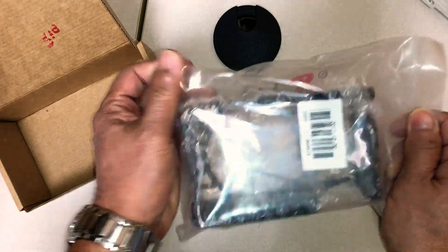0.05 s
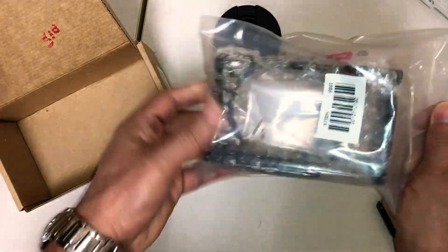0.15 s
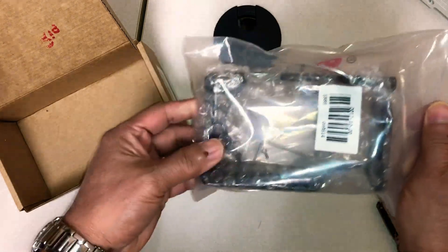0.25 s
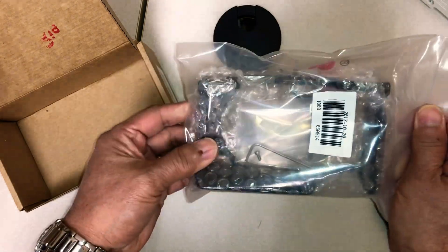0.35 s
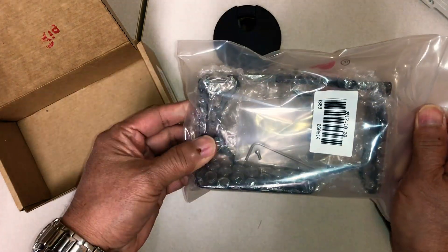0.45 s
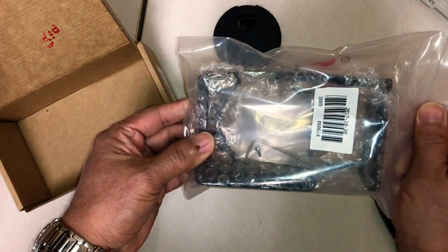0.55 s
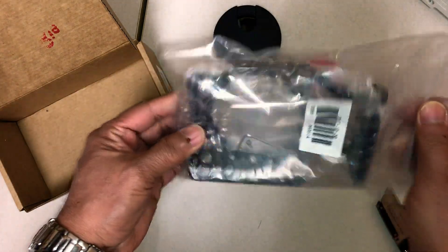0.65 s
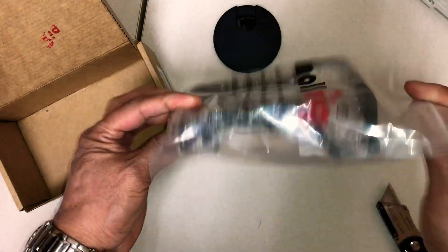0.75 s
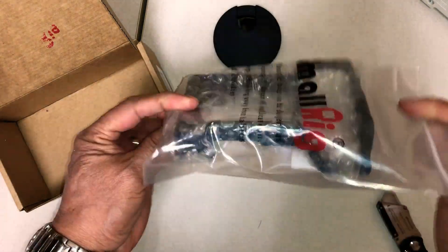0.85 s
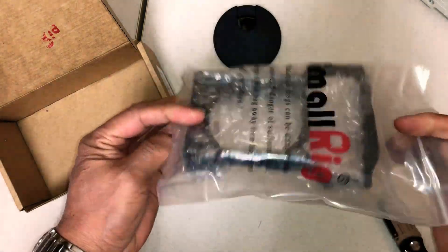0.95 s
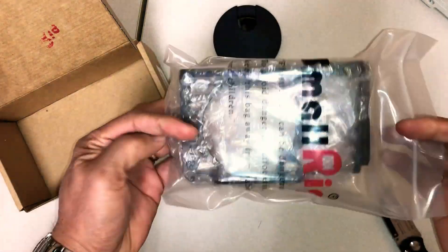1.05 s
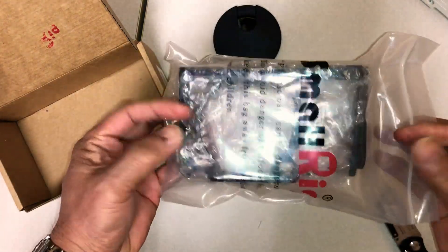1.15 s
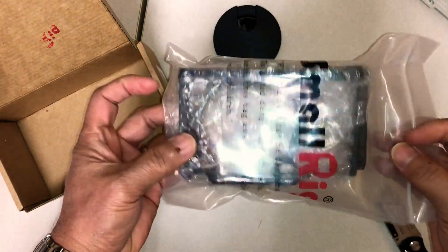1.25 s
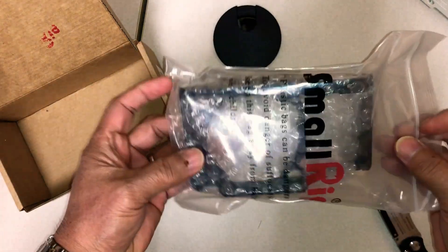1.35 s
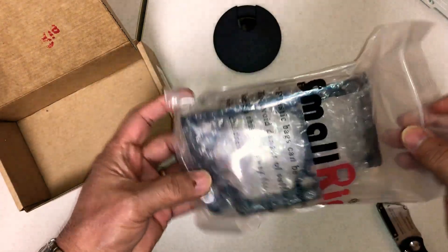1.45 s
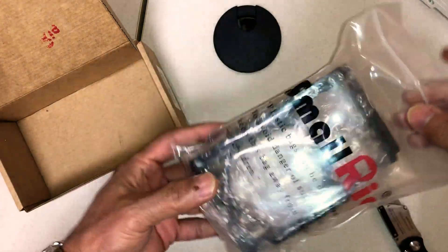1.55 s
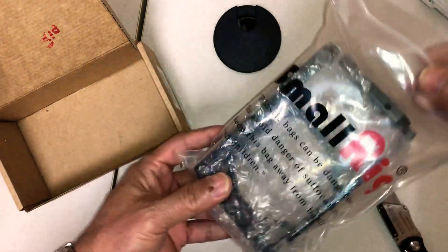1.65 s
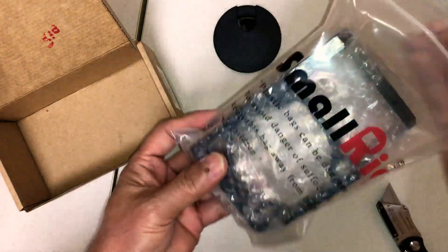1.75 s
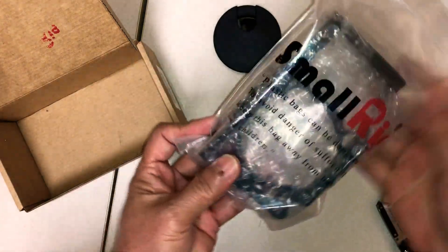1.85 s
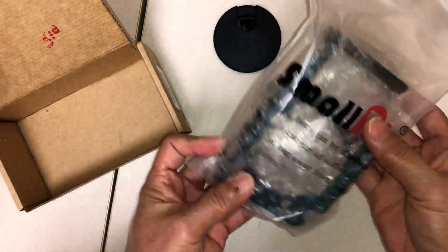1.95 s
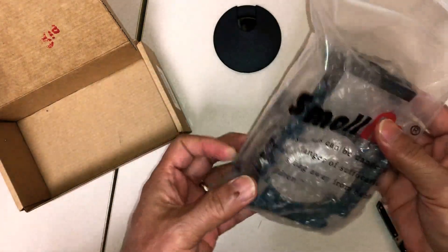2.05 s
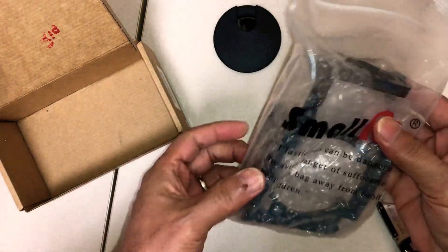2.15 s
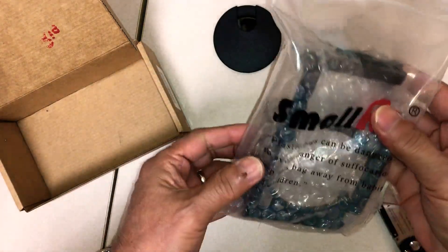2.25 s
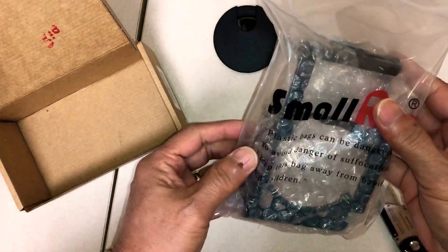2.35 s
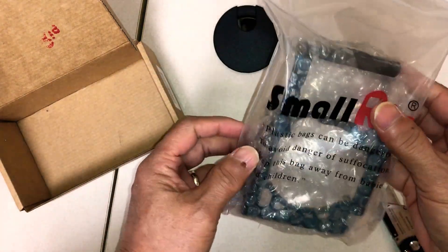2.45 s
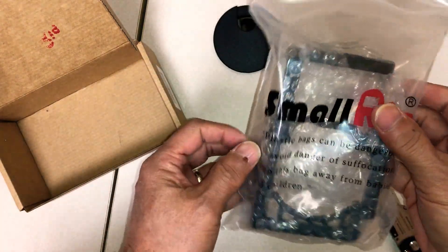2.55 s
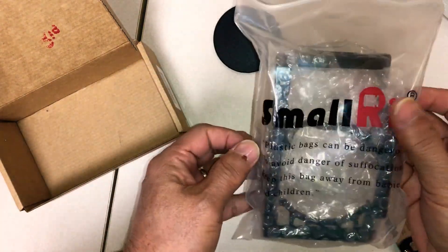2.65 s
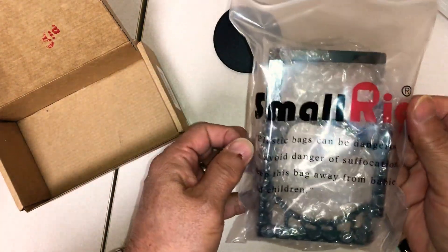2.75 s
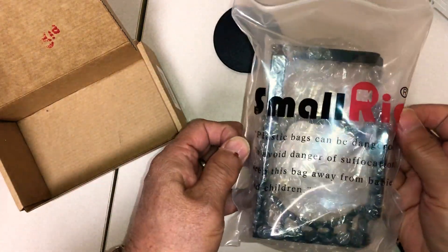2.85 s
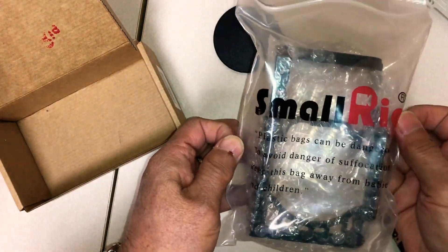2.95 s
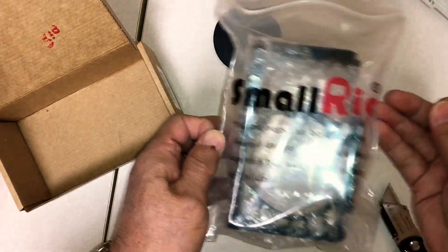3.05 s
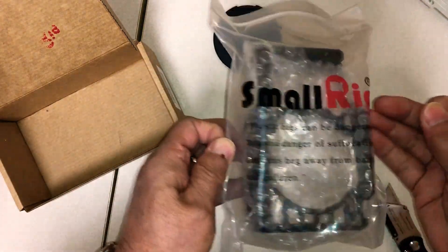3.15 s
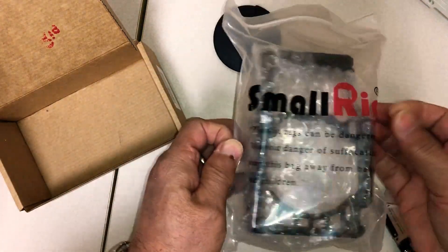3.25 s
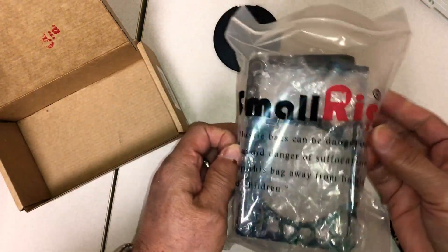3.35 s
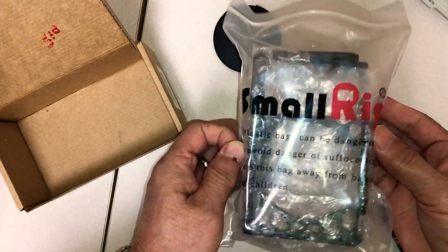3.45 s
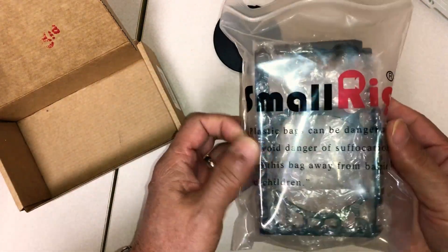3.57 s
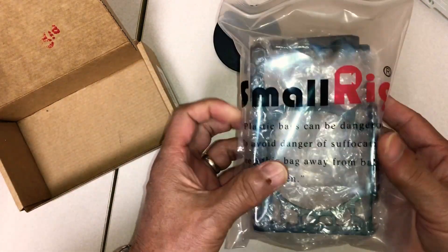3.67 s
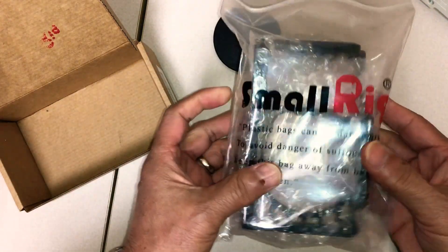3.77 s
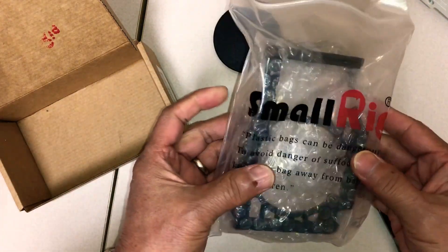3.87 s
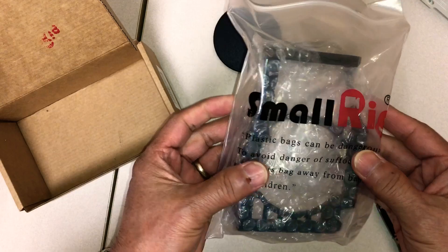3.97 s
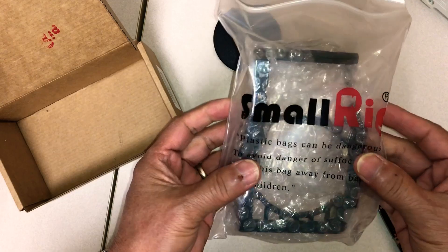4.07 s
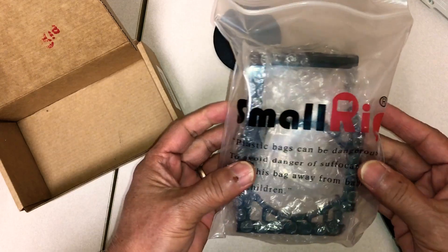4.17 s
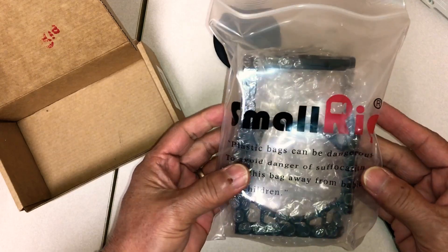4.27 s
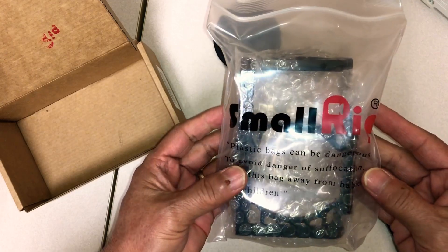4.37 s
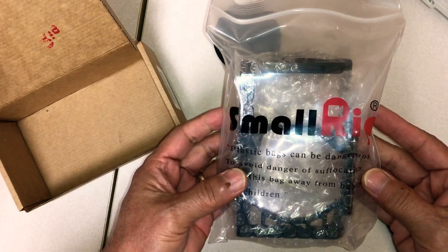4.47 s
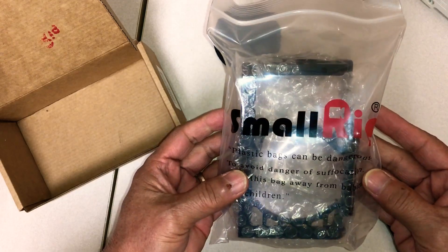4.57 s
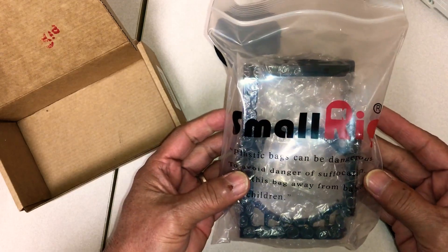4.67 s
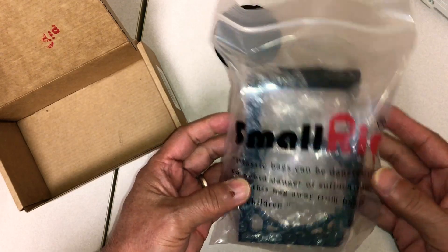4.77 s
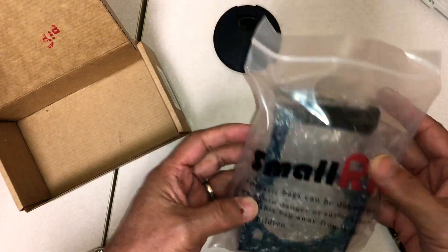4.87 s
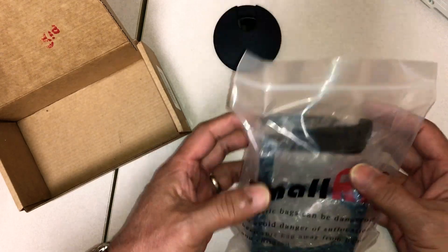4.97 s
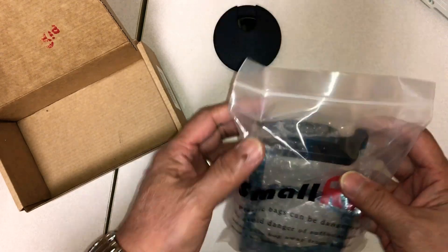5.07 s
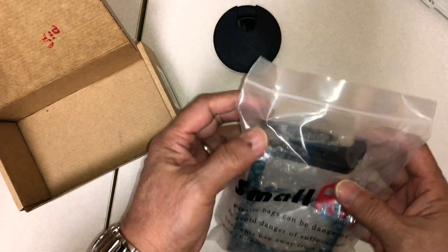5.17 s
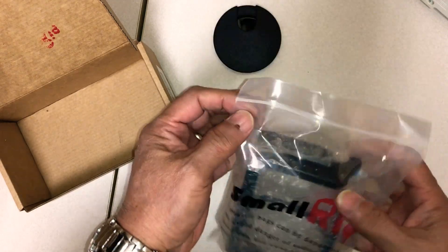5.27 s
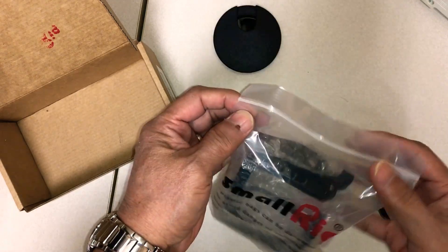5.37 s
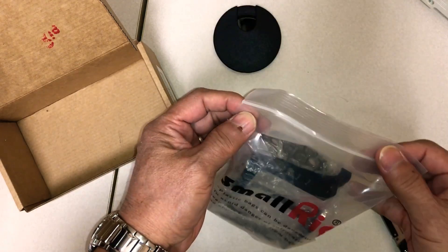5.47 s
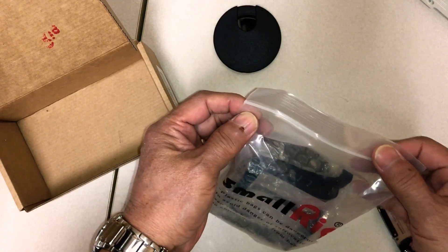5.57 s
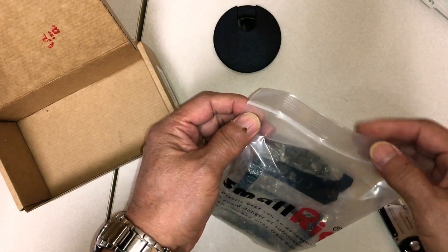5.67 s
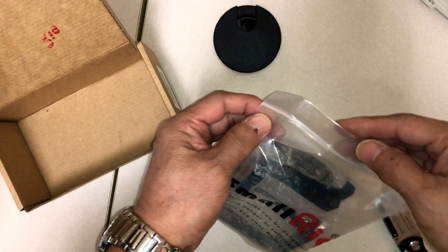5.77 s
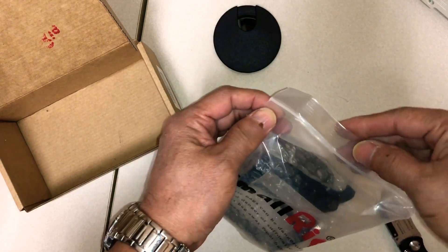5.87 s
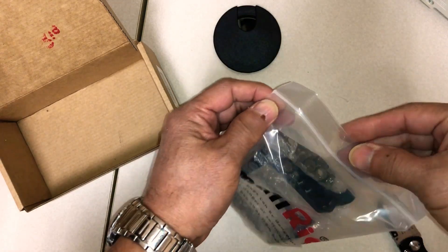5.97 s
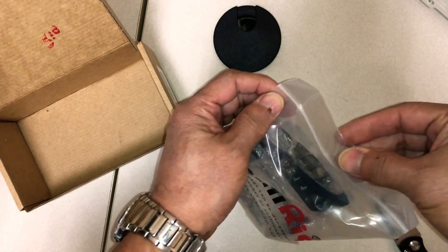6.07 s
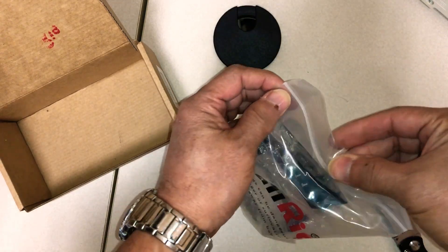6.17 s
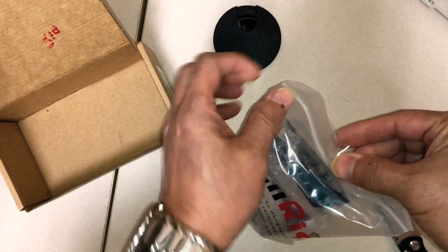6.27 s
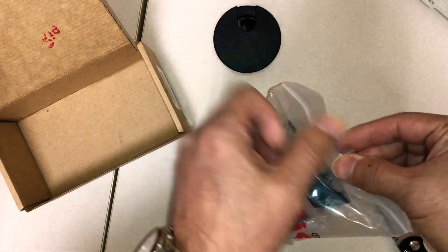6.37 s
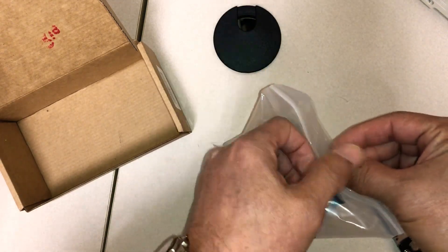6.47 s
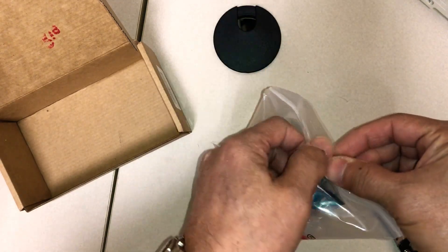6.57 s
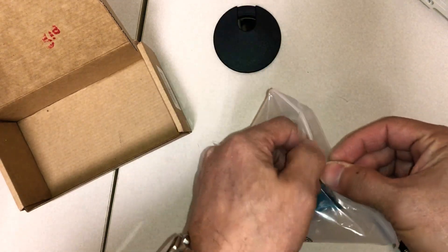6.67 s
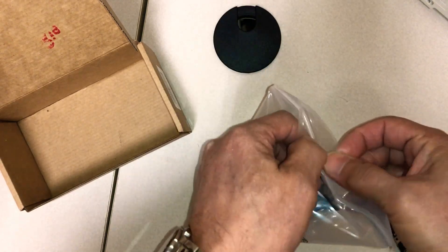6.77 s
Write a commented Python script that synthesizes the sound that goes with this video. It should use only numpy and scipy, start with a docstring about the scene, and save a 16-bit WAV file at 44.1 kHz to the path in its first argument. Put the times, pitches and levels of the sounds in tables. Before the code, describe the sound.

Close plastic packaging crackles and pops hollowly as hands turn it, quiets, then rustles briefly while fingers rub its seal over a faint hum.

```python
"""Short hollow snaps of a buckling plastic bag, close by in a small room: cracks, falling rings, air pushes.
Hands turn the bag, which holds a metal frame in bubble wrap; between snaps the film slides and crinkles,
made of random creases and smooth friction noise. Near the end fingers rub its seal: noise through resonances.
The frame clinks faintly once as decaying modes. Under it all lie coloured air noise and a low electric hum
of wavering sines; a decaying noise tail gives the echo."""
import sys
import numpy as np
from scipy import signal
from scipy.fft import rfft, irfft
from scipy.io import wavfile
from scipy.ndimage import uniform_filter1d

SR = 44100
rng = np.random.default_rng(int(sys.argv[2]) if len(sys.argv) > 2 else 0)


def materialize(psi):
    """Save the field psi as 16-bit PCM at rate SR to the path in sys.argv[1].

    A 1-D psi becomes a single channel; in a 2-D psi each row is a channel.
    """
    bounded = np.clip(np.atleast_2d(psi).T, -1, 1)
    quanta = np.round(bounded * 32767).astype(np.int16)
    wavfile.write(sys.argv[1], SR, quanta)


N = 300762  # length [samples]


def amp(db):
    """Level law: decibels to amplitude gain, 20 dB per factor of ten."""
    return 10 ** (np.asarray(db) / 20)


def evened(x):
    """Normalisation of mean power: scales to rms 1."""
    return x / np.sqrt(np.mean(x ** 2) + 1e-20)


def read(points, hz):
    """Interpolation along a logarithmic frequency axis."""
    point_hz, value = np.transpose(points)
    return np.interp(np.log(hz + 1), np.log(point_hz + 1), value)


def add(mix, s, sound):
    """Superposition: adds a sound to the mix in place, from s seconds on."""
    part = mix[max(0, round(s * SR)):][:len(sound)]
    part += sound[:len(part)]


def colour(x, points, size=2048):
    """Minimum-phase filtering: the Hilbert transform of the log gain gives the phase of a causal filter."""
    hz = abs(np.fft.fftfreq(size, 1 / SR))
    log_gain = np.log(amp(read(points, hz)))
    response = np.exp(signal.hilbert(log_gain).conj())
    taps = np.fft.ifft(response).real[:size // 2]
    return signal.oaconvolve(x, taps)[:len(x)]


def wander(hz):
    """Low-passed noise of rms 1: a random fluctuation whose spectrum falls off around the given rate."""
    f = np.fft.rfftfreq(N, 1 / SR)
    spectrum = rfft(rng.standard_normal(N)) / (1 + (f / hz) ** 4)
    return evened(irfft(spectrum, N))


def swell(start, length, attack_s, release_s):
    """Envelope of one movement: linear rise, hold to the end of its length, exponential decay."""
    t = np.arange(N) / SR - start
    rise = np.clip(t / attack_s, 0, 1)
    return rise * np.exp(-np.clip((t - length) / release_s, 0, 30))


def background():
    """Stationary noise and periodic sources: ventilation noise and a slightly wavering hum."""
    # ventilation spectrum: (frequency [Hz], relative level [dB])
    air_colour = [(20, -12.5), (40, -6.5), (62, 4), (100, 2), (165, 0), (210, -4), (270, -5), (380, -4.5),
                  (450, -3.5), (650, -18.5), (1200, -16.5), (2500, -26), (5000, -31), (10000, -41),
                  (16000, -42)]
    # hum lines: (frequency [Hz], central rms level [dB])
    hum_lines = [(119.7, -60.5), (327, -76), (377, -69), (447, -76.5)]
    t = np.arange(N) / SR
    air = amp(-61) * evened(colour(rng.standard_normal(N), air_colour, size=8192))
    hum = np.zeros(N)
    for hz, db in hum_lines:
        level = amp(db + 1.6 * wander(hz=4.1)) * np.sqrt(2)
        phase = 2 * np.pi * hz * t + 0.36 * wander(hz=2.7)
        hum += level * np.sin(phase)
    return hum + air


def room(x):
    """Diffuse reverberation: dense reflections after 6 ms, each band decaying exponentially at its own rate."""
    # reverberation time: (frequency [Hz], t60 [s])
    decay_times = [(150, 0.5), (500, 0.08), (1200, 0.29), (4000, 0.43), (12000, 0.26)]
    # strength of the reverberation: (frequency [Hz], gain [dB])
    echo_levels = [(150, -8), (400, -2), (1000, -18.5), (2300, -17), (4000, -20), (8000, -17), (15000, -20)]
    hz, t, noise = signal.stft(rng.standard_normal(SR // 2), SR, nperseg=256)
    t60 = read(decay_times, hz)[:, None]
    decay = np.exp(-np.log(1000) * t / t60)
    # so that a longer decay brings no more energy
    decay = decay * np.sqrt(2 * np.log(1000) / (t60 * SR))
    gain = amp(read(echo_levels, hz))[:, None]
    tail = signal.istft(noise * decay * gain, SR, nperseg=256)[1]
    out = np.zeros(N)
    add(out, 0.006, signal.fftconvolve(x, tail))
    return out


def drag():
    """Power addition: gains of body, rustle and fizz over time, strokes on top of the changing hold."""
    # rustle under the holding fingers: (time [s], level before the part offsets [dB])
    hold_levels = [(0.42, -56), (0.5, -75), (0.65, -69.5), (0.75, -64), (4.33, -66), (4.5, -77),
                   (4.79, -87), (4.85, -67), (5.53, -57.5), (5.62, -74), (6.3, -80), (6.42, -76.5),
                   (6.82, -76)]
    # moves of the hands that drag the film over the wrap, levels before the grip varies them:
    # (start [s], length [s], hollow body level [dB], rustle level [dB], fizz level [dB])
    strokes = [(0.0, 0.1, -47.5, -61, -77), (0.148, 0.31, -63, -57.5, -64.5),
               (0.714, 0.085, -48.5, -57, -55.5), (0.785, 0.095, -52, -58, -59),
               (0.944, 0.21, -46, -51.5, -55.5), (1.294, .09, -43.5, -54, -58),
               (1.543, 0.31, -55.5, -60, -63), (1.67, 0.21, -53, -56.5, -57.5),
               (1.898, 0.067, -45, -52, -53), (2.009, 0.15, -50, -50, -56), (2.272, 0.13, -57, -58.5, -63),
               (2.497, 0.069, -46, -59, -70), (2.621, .10, -60, -61, -63.5),
               (2.766, 0.18, -54.5, -62.5, -73), (3.068, 0.031, -45, -49, -59),
               (3.194, 0.09, -49, -57.5, -64.5), (3.317, 0.17, -49.5, -54, -58),
               (3.579, 0.098, -48, -55, -60), (3.736, 0.097, -52, -55.5, -60.5),
               (3.793, .12, -49, -52.5, -57.5), (3.963, 0.11, -50, -64, -77), (4.175, 0.018, -48, -71, -78),
               (4.29, 0.11, -66, -70, -75), (4.8, 0.18, -62, -64, -68), (4.978, .15, -54.5, -59, -61),
               (5.247, 0.12, -60.5, -59.5, -61), (5.388, .11, -57, -72, -67),
               (5.69, 0.068, -57, -61.5, -60), (5.81, 0.085, -62, -65, -70), (6.0, 0.17, -64, -67.5, -74.5),
               (6.127, 0.089, -52, -56.5, -68), (6.236, 0.094, -57, -63, -67.5),
               (6.483, .04, -86, -67, -75), (6.597, 0.15, -67, -64.5, -64.5),
               (6.721, 0.042, -50.5, -57, -72)]
    part_offsets_db = (3, 1, -2)  # body, rustle and fizz over the hold level
    hold_db = np.interp(np.arange(N) / SR, *np.transpose(hold_levels))
    power = np.outer(amp(part_offsets_db) ** 2, amp(hold_db) ** 2)
    for start, length, *levels_db in strokes:
        envelope = swell(start, length, attack_s=0.012, release_s=0.027)
        power += np.outer(amp(levels_db) ** 2, envelope ** 2)
    return np.sqrt(power)


def crinkle(per_s, spread_db, count=7):
    """Impulsive scattering: tiny creases of very unequal size, each in its own band, over smooth friction."""
    # creasing rather than smooth rubbing: (time [s], share of power [0-1])
    creasing_share = [(0, 0.7), (.6, 0.48), (2.7, 0.15), (4.3, 0), (4.6, 1), (4.9, 0.05), (5.4, 0.2),
                      (6.8, 0.2)]
    # band position: 1.5 bands per octave above 1 kHz
    place = np.clip(np.log2(np.fft.rfftfreq(N, 1 / SR) / 1000 + 1e-6) * 1.5, 0, count - 1)
    spectrum = 0
    for band in range(count):
        size = amp(spread_db * np.minimum(rng.exponential(1, N), 3.5))
        clicks = size * (rng.random(N) < per_s / SR)
        # the power of each click dies away with a time constant of 0.9 ms
        power = signal.lfilter([1], [1, -np.exp(-1 / (0.0009 * SR))], clicks ** 2)
        scatter = np.sqrt(power) * rng.standard_normal(N)
        # neighbouring bands overlap, so together they are even
        band_gain = np.sqrt(np.maximum(1 - abs(place - band), 0))
        spectrum = spectrum + rfft(evened(scatter)) * band_gain
    creases = evened(irfft(spectrum, N))
    friction = rng.standard_normal(N)
    share = np.clip(np.interp(np.arange(N) / SR, *np.transpose(creasing_share)), 0, 1)
    return np.sqrt(share) * creases + np.sqrt(1 - share) * friction


def sliding(body_gain, rustle_gain, fizz_gain):
    """Stick-slip: the film catches and slips in clumps; the air cushions give it a hollow body."""
    # spectra of the three parts: (frequency [Hz], relative level [dB])
    body_colour = [(100, -34), (250, -7), (430, -16), (640, -7), (850, -3), (1200, 0), (1600, -5.5),
                   (2300, -14), (5000, -43)]
    rustle_colour = [(500, -48.5), (1300, -16.5), (1850, -1), (2400, 4), (3100, -0.5), (4200, -0.5),
                     (5600, -4.5), (7500, -14), (14000, -43)]
    fizz_colour = [(2500, -42), (5000, -10.5), (6300, 0.5), (8200, -1.5), (10000, -6.5), (12500, -12),
                   (15800, -16.5)]
    # the grip changes slowly; within it the film slips in quick little jerks
    grip, slips = wander(hz=39.6), wander(hz=218)
    grains = crinkle(per_s=260, spread_db=6.5) * amp(1.5 * slips)
    body = evened(colour(grains, body_colour)) * body_gain * amp(4.0 * grip - 4.2)
    rustle = evened(colour(grains, rustle_colour)) * rustle_gain * amp(1.0 * grip)
    fizz = evened(colour(grains, fizz_colour)) * fizz_gain * amp(1.7 * grip)
    return body + rustle + fizz


def rubbing():
    """Stick-slip excitation of resonators: skin rubs the stretched seal and drives its resonances."""
    # resonances of the taut film: (frequency [Hz], bandwidth [Hz], relative level [dB])
    seal_modes = [(2400, 190, 4.5), (3420, 220, 5.5), (4480, 450, 8), (5350, 630, -1), (6900, 360, 3.5),
                  (7480, 300, -4), (7850, 280, -1), (9700, 260, -16)]
    # fingertips rubbing the taut seal: (start [s], length [s], level [dB])
    rubs = [(5.72, 0.035, -73), (5.845, 0.051, -60.5), (6, .06, -70), (6.257, 0.078, -65),
            (6.501, 0.044, -65.5), (6.6, 0.054, -58), (6.707, 0.057, -54.5)]
    t = np.arange(SR // 50) / SR
    ring = np.zeros(len(t))
    for hz, width, db in seal_modes:
        ring += amp(db) * width * np.exp(-np.pi * width * t) * np.sin(2 * np.pi * hz * t)
    friction_colour = [(300, -23), (2000, 3), (9000, 2.5), (16000, -18)]  # (frequency [Hz], level [dB])
    friction = colour(rng.standard_normal(N), friction_colour) * amp(2.8 * wander(hz=150))
    pressure = np.zeros(N)
    for start, length, db in rubs:
        pressure += amp(db) * swell(start, length, attack_s=0.006, release_s=0.01)
    return pressure * evened(signal.oaconvolve(friction, ring)[:N])


def clinks():
    """Modal synthesis: the metal frame rings briefly in damped modes, held short by its wrap."""
    # clinks of the frame: (time [s], gain on all modes [dB])
    clink_times = [(0.984, -56)]
    # modes of the frame: (frequency [Hz], relative level [dB], t60 [s])
    frame_modes = [(2480, 7, 0.11), (3960, 8, .06), (4970, -16, 0.095), (6250, 5, 0.16), (8440, 0, .06)]
    t = np.arange(SR // 5) / SR
    ring = sum(amp(db - 60 * t / t60) * np.sin(2 * np.pi * hz * t) for hz, db, t60 in frame_modes)
    out = np.zeros(N)
    for s, db in clink_times:
        add(out, s, amp(db) * ring)
    return out


def snap(ring_hz, ring_db, push_db, crack_db, crease_hz, tick_db, bright_db):
    """Snap-through buckling: a flipping crease cracks, then the panel swings a few cycles, falling in pitch."""
    # spectra of treble tick, crack and push on the air in the bag: (frequency [Hz], relative level [dB])
    tick_points = [(1500, -56.5), (3600, -21), (4700, -4.5), (5600, -3.5), (7500, -2), (10000, -9.5),
                   (13000, -14.5), (16000, -22)]
    crack_points = [(400, -32), (800, -12), (1200, -7.5), (1600, 1), (1950, 0), (2500, 0.5), (3100, -2.5),
                    (4200, -4.5), (5200, -11), (10000, -54.5)]
    push_points = [(50, -43.5), (140, -2), (200, -6), (260, 0), (400, 2.5), (520, -2), (640, -9.5),
                   (790, 1), (1000, -14.5), (2500, -42.5)]
    t = np.arange(SR // 30) / SR
    tick_noise, crack_noise, push_noise, wrinkles = rng.standard_normal((4, len(t)))
    first = signal.unit_impulse(len(t), 8)
    # bright_db tilts the tick above 5 kHz [dB per octave]
    tick_colour = [(hz, db + bright_db * np.log2(max(hz, 5000))) for hz, db in tick_points]
    tick = colour(tick_noise * np.exp(-t / 0.0027) + 3.8 * first, tick_colour)

    # each crease has its own broad resonance; a soft flip with little tick has a duller crack too
    f = np.geomspace(200, 16000, num=64)
    slope_db = np.clip(0.44 * (tick_db - crack_db + 10.0), -12, 0)
    crease_db = 7 * np.exp(-(np.log2(f / crease_hz) / 0.13) ** 2)
    crack_gain_db = read(crack_points, f) + crease_db + slope_db * np.log2(np.maximum(f, 2000))
    crack_burst = crack_noise * np.exp(-(t / 0.0028) ** 1.12) + 5.5 * first
    crack = colour(crack_burst, np.c_[f, crack_gain_db])

    push_swell = (1 - np.exp(-t / 0.00095)) * np.exp(-t / 0.0043)
    push = colour(push_noise * push_swell, push_points)

    # bending waves carry the highs fastest, so the pitch falls; wrinkles make it uneven
    unevenness = evened(uniform_filter1d(wrinkles, size=24))
    hz = ring_hz * (0.841 + 0.5 * np.exp(-t / 0.0019) + 0.12 * unevenness)
    swing = (1 - np.exp(-t / 0.0015)) * (np.exp(-(t / 0.0041) ** 6.07) + 0.05 * np.exp(-t / 0.014))
    ring = np.sin(2 * np.pi * np.cumsum(hz) / SR) * swing

    levels_db = (ring_db, push_db - 0.8, crack_db + 0.5, tick_db + 0.297)
    out = np.zeros(len(t))
    for db, part in zip(levels_db, (ring, push, crack, tick)):
        # the level is the rms that the part's energy would have if spread over 3.7 ms
        out += amp(db) * part * np.sqrt(0.0037 * SR / np.sum(part ** 2))
    return out


def snaps(rows):
    """Superposition of buckling events of the bag and the wrap."""
    # slope of the treble tick over time: (time [s], slope above 5 kHz [dB per octave])
    tick_slopes = [(0.2, -5), (1.1, 0.5), (2.5, -3), (3.1, 9), (3.4, -2.5), (6.2, -6.5)]
    out = np.zeros(N)
    for s, *row in rows:
        bright_db = np.interp(s, *np.transpose(tick_slopes))
        add(out, s, snap(*row, bright_db))
    return out


def small_snaps(gains, count=260):
    """Poisson process: rows for lesser chance buckles, as strong as the film is dragged at that moment."""
    rate_per_s, spread_oct, spread_db = 22, 0.15, 3.5
    middle_hz = (1158, 2800)  # ring and crease
    offsets_db = (1.5, -1, 2, -1)  # ring and push over the sliding body, crack over rustle, tick over fizz
    times = np.cumsum(rng.exponential(1 / rate_per_s, count))
    rows = []
    for s, z in zip(times[times < N / SR], rng.standard_normal((count, 6)).clip(-2, 2)):
        body_db, rustle_db, fizz_db = 20 * np.log10(gains[:, int(s * SR)])
        levels_db = np.add((body_db, body_db, rustle_db, fizz_db), offsets_db)
        ring_db, push_db, crack_db, tick_db = levels_db + spread_db * z[2:]
        ring_hz, crease_hz = np.multiply(middle_hz, 2 ** (spread_oct * z[:2]))
        rows.append((s, ring_hz, ring_db, push_db, crack_db, crease_hz, tick_db))
    return rows


def snap_echoes(rows, count=3, spread_oct=0.42):
    """Directivity: wrinkled film sends each wall a wave with its own crease pitch; the echo blends them."""
    waves = np.zeros(N)
    for _ in range(count):
        seen = np.array(rows)
        seen[:, 5] *= 2 ** (spread_oct * rng.standard_normal(len(rows)))  # crease resonance
        waves += snaps(seen)
    return room(waves) / np.sqrt(count)


def scene():
    """Direct and reverberant field: the package near the microphone, its echo, and the room's own sound."""
    # the clear buckles of the film, levels before small fixed trims of push, crack and tick:
    # (time [s], nominal ring frequency [Hz], ring level [dB], low push level [dB], crack level [dB],
    #  crease resonance [Hz], treble tick level [dB])
    clear_snaps = [(0.0348, 1100, -39.5, -36.5, -37, 3180, -42.5),
                   (0.0431, 960, -38.5, -38.5, -54, 3800, -59), (0.0906, 840, -32, -43, -58, 2600, -70),
                   (0.1156, 1250, -33, -30, -38, 3160, -55), (0.1471, 1130, -22.5, -29.5, -22, 1860, -42.5),
                   (0.1545, 1156, -26.5, -31, -37, 1800, -64), (0.194, 1150, -29, -49, -55, 1820, -73),
                   (0.2139, 1210, -29, -40, -47, 1900, -68), (0.235, 1175, -30, -48, -36, 1910, -57),
                   (0.2452, 1240, -30, -41, -27.5, 4230, -38), (0.25, 1160, -27, -35, -42, 2000, -46),
                   (0.3006, 1150, -32, -37, -52, 2500, -58), (0.349, 1180, -29, -40.5, -30.5, 3140, -48),
                   (0.4094, 1210, -30, -36, -41.5, 1900, -46), (0.526, 1200, -81, -59, -57, 4200, -62),
                   (0.548, 1200, -71, -62, -64, 3600, -57.5), (0.6687, 990, -58, -48, -62, 1800, -75),
                   (0.7312, 1160, -39.5, -46, -63, 1800, -63), (0.758, 1160, -34, -37.5, -36.5, 1830, -65),
                   (0.7674, 1200, -53, -60, -39, 4370, -45), (0.7763, 1320, -51, -60, -38.5, 1950, -43.5),
                   (0.8423, 1240, -38.5, -59, -52, 1800, -54), (0.9548, 1267, -18.5, -30, -27.5, 2650, -34),
                   (0.9956, 1070, -39, -38, -40, 2390, -54), (1.1002, 1200, -54, -43, -38, 1920, -38),
                   (1.1109, 1140, -37.5, -37.5, -36.5, 2540, -37.5),
                   (1.1642, 1140, -32, -58, -26.5, 4000, -34.5), (1.169, 1125, -28.5, -63, -40, 1900, -61),
                   (1.3083, 1260, -30.5, -55, -32, 1780, -56), (1.325, 1110, -31.5, -41, -33, 1790, -46.5),
                   (1.3349, 1260, -33, -42, -34.5, 1770, -74), (1.3864, 1230, -36, -37.5, -44, 1800, -59),
                   (1.469, 1070, -73, -72, -73, 4100, -55), (1.6106, 1130, -40.5, -45, -55, 2500, -74),
                   (1.6264, 1105, -24.5, -33, -33, 2380, -51), (1.7071, 1100, -39.5, -43, -46.5, 2000, -50),
                   (1.8246, 1140, -35, -40.5, -54, 1800, -51),
                   (2.039, 1260, -33.5, -32.5, -27.5, 1870, -31.5),
                   (2.0783, 1230, -29, -55, -32, 1740, -56), (2.0843, 1160, -28.5, -50, -38, 1800, -39),
                   (2.0946, 1130, -27, -38, -28, 1860, -53), (2.1008, 1320, -27, -46, -36, 4300, -26.5),
                   (2.118, 1200, -20.5, -33, -31, 1880, -32), (2.1513, 1070, -25.5, -48, -30.5, 3030, -40),
                   (2.1639, 1220, -31, -34.5, -36, 1790, -57.5), (2.3267, 1015, -36, -40.5, -49, 1800, -80),
                   (2.397, 1120, -21.5, -49, -24, 4370, -32), (2.415, 1090, -25.5, -39.5, -39, 1810, -47),
                   (2.5177, 1100, -28, -51, -32, 2170, -38.5), (2.5493, 1100, -26, -49, -34, 2590, -60),
                   (2.591, 1160, -41.5, -42.5, -47, 1800, -74), (2.7535, 1130, -41.5, -42, -52, 2100, -79),
                   (2.8495, 1120, -36.5, -42.5, -41, 2320, -68), (2.9335, 1164, -33.5, -59, -33, 2180, -51),
                   (2.9723, 1120, -35.5, -50, -52, 1790, -65), (3.084, 1170, -19, -33, -21.5, 2000, -33),
                   (3.1591, 1153, -30.5, -39, -42, 1800, -77), (3.2024, 1050, -33, -50, -33, 2450, -63),
                   (3.2119, 1180, -34.5, -51, -37.5, 1820, -59), (3.3663, 1200, -36, -62, -40, 1800, -50),
                   (3.3807, 1204, -24.5, -45, -29.5, 1960, -46), (3.4591, 1030, -29, -58, -64, 1800, -66),
                   (3.6378, 1250, -32, -42, -38, 1740, -43), (3.7526, 1115, -34.5, -49, -43, 2020, -57),
                   (3.8831, 1220, -32, -41, -46, 1900, -74), (3.9002, 1137, -23.5, -41, -17.5, 2420, -33.5),
                   (3.9343, 1180, -37, -37.5, -59, 2200, -62), (3.9517, 1130, -29, -31.5, -35, 1720, -57),
                   (4.0254, 1080, -33.5, -45, -54, 1800, -55), (4.055, 1080, -29, -33.5, -35.5, 1630, -63),
                   (4.1803, 1025, -27, -33.5, -26.5, 3220, -44.5),
                   (4.3172, 990, -43, -45.5, -46, 1800, -80), (4.6187, 1020, -71.5, -67.5, -65, 4170, -70),
                   (4.8459, 945, -49, -45.5, -59.5, 2600, -65), (5.059, 1204, -36, -47.5, -62, 2000, -70),
                   (5.082, 1130, -38, -35.5, -49, 2800, -62), (5.2217, 1070, -69, -42.5, -69, 1790, -75),
                   (5.4169, 1200, -44, -47, -58, 1800, -65), (5.4376, 1250, -41, -45.5, -67, 1800, -68),
                   (5.4644, 1410, -27, -45, -23.5, 2960, -41), (5.5348, 1340, -39, -37.5, -46, 1800, -69),
                   (5.7119, 1230, -45.5, -45.5, -53, 2480, -64), (5.756, 1330, -63, -65, -48.5, 3500, -54),
                   (6.1435, 1240, -31, -38, -34, 1760, -36.5), (6.1644, 1270, -47, -32, -29.5, 2180, -51),
                   (6.2079, 1383, -26, -36, -29, 2380, -35.5), (6.334, 1330, -39.5, -45.5, -52, 1800, -60),
                   (6.7237, 1220, -35.5, -35, -57, 1800, -66)]
    gains = drag()
    steady = background()
    buckles = snaps(clear_snaps) + snap_echoes(clear_snaps)
    handling = sliding(*gains) + rubbing() + clinks() + snaps(small_snaps(gains))
    return (buckles + handling + room(handling) + steady)[None]


def record(dry):
    """Band limitation: a linear-phase low-pass ends the treble near 15.95 kHz."""
    edge_hz = 15950
    taps = signal.firwin(401, edge_hz, window=("kaiser", 9), fs=SR)
    return signal.oaconvolve(dry, taps[None], "same")


dry = scene()
out = record(dry)
materialize(out)
```